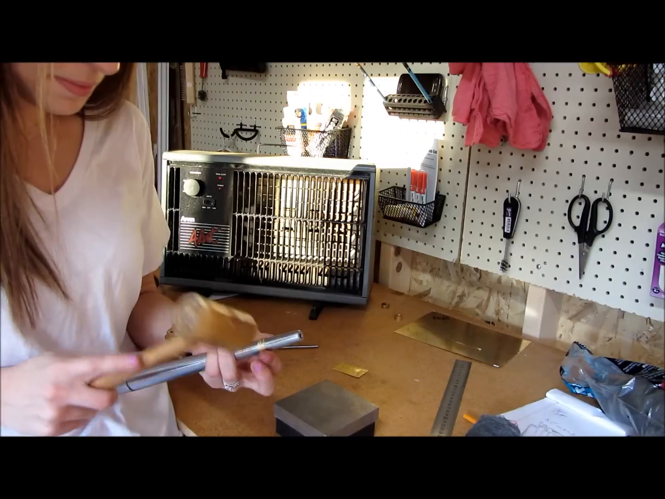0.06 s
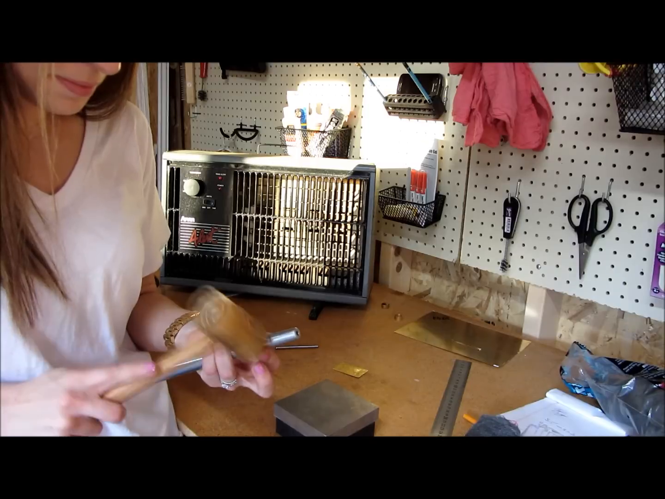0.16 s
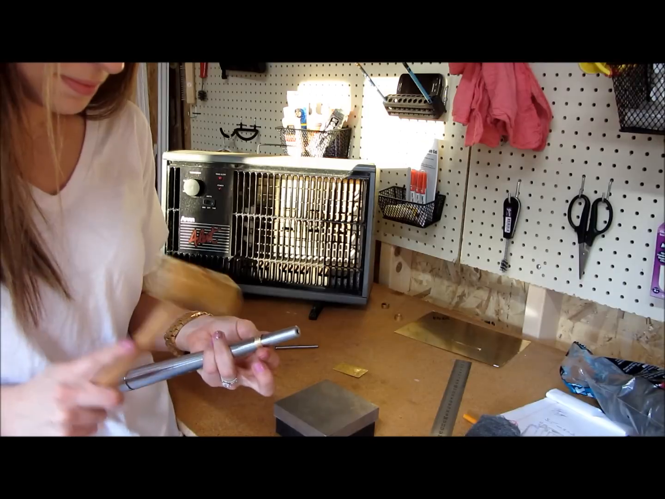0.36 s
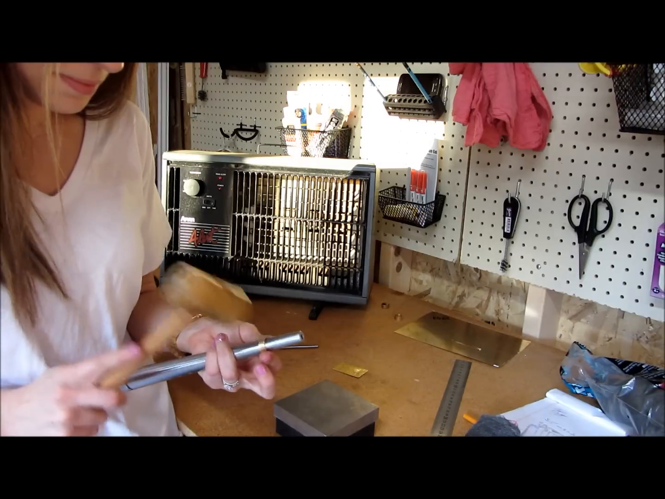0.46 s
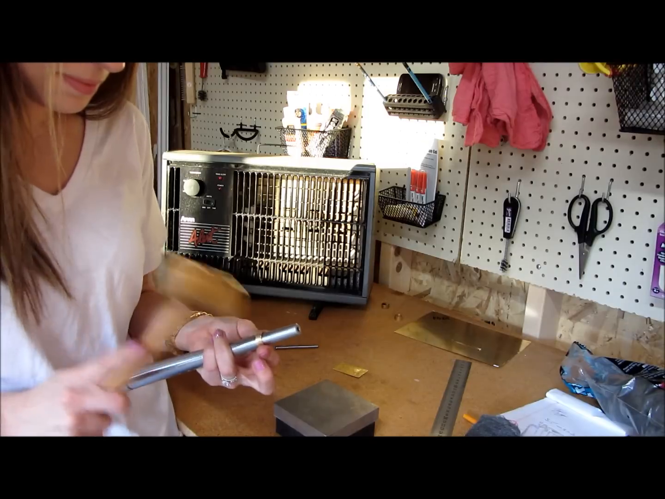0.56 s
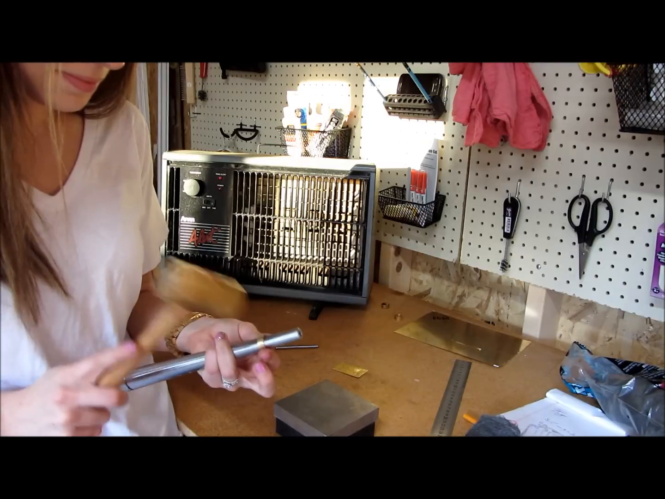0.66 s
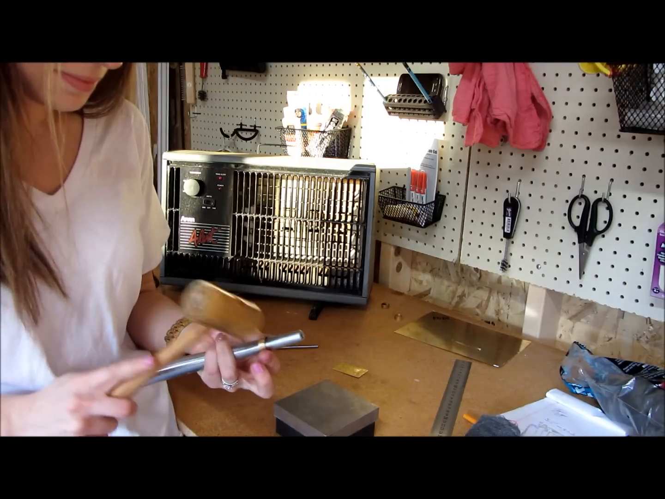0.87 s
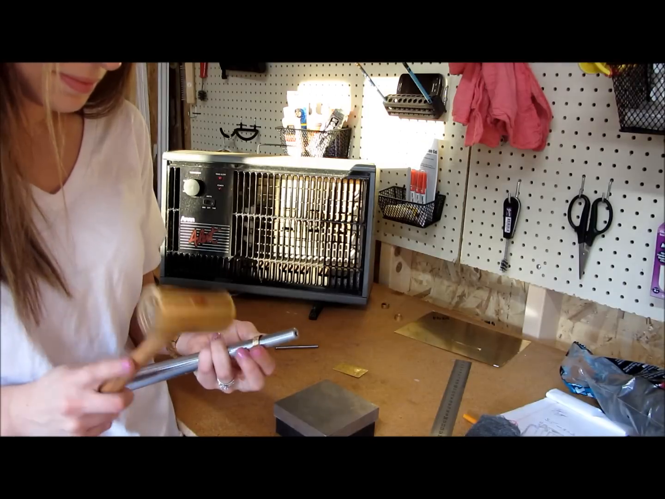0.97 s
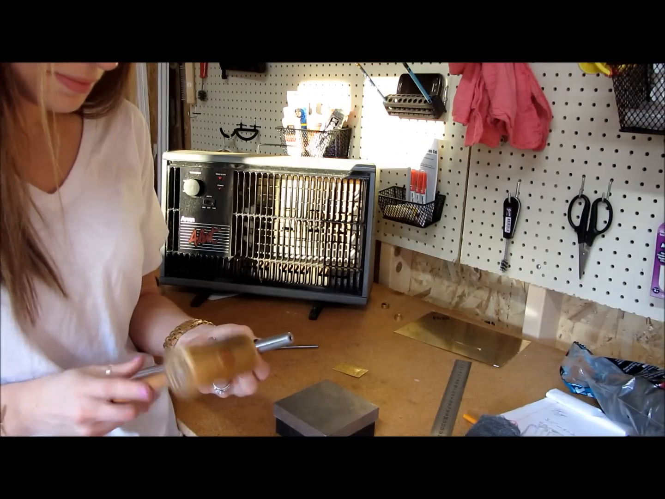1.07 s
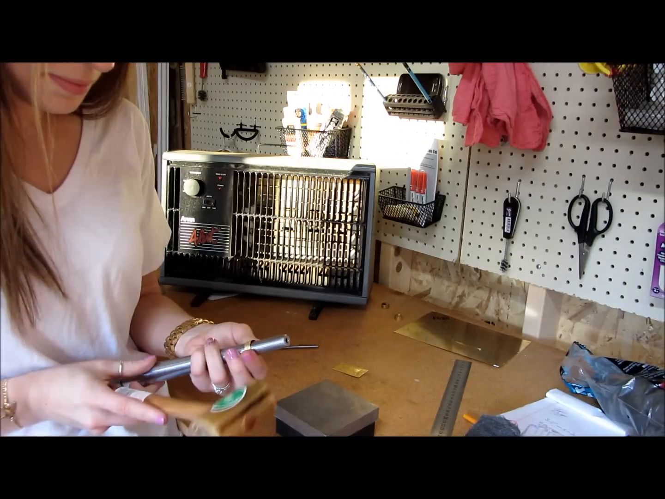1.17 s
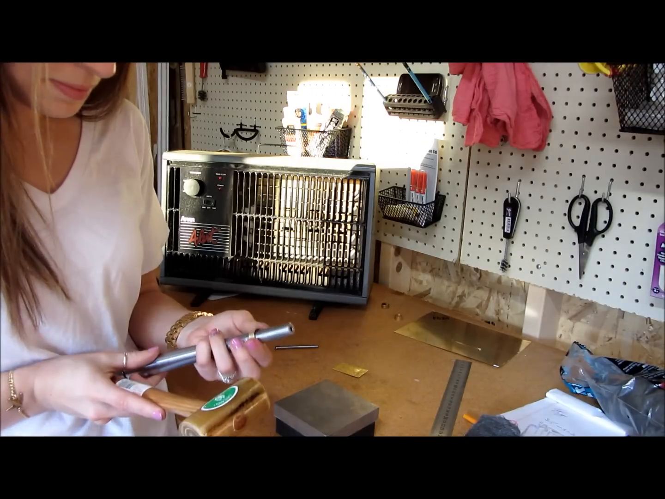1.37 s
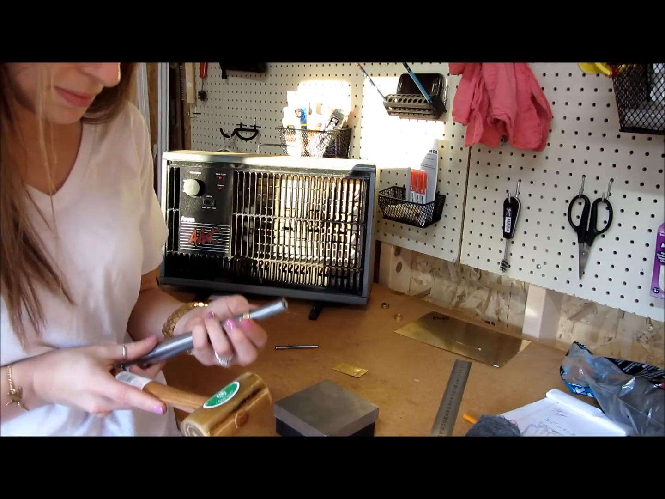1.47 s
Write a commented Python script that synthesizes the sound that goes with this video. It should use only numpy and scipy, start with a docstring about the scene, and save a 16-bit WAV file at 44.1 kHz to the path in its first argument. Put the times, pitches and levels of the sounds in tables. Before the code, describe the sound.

A mallet taps a ring on a hand-held steel rod four times, quickly and evenly. Each dry knock carries a brief metallic clink. A faint tick follows, heard close by in a small, quiet workshop.

```python
"""A mallet taps a ring on a hand-held steel mandrel four times in a small, quiet workshop.
Each impact gives a dry knock and excites the bending modes of the bar, in a mix set by where it lands;
the hand soon damps them. The ring clacks on the bar, faint resonances of the bench and the room ring
after each knock, and the walls reverberate. One faint tick of metal follows.
Soft air noise, a rumble and a low mains hum lie underneath."""
import sys
import numpy as np
from scipy import signal
from scipy.fft import rfft, irfft
from scipy.io import wavfile

SR = 44100
rng = np.random.default_rng(int(sys.argv[2]) if len(sys.argv) > 2 else 0)


def master_out(mix):
    """Clip the mix to full scale and print it as 16-bit PCM to the path in sys.argv[1]."""
    frames = np.transpose(np.atleast_2d(mix))
    ceiling = np.clip(frames, -1, 1)
    pcm = np.round(ceiling * 32767).astype(np.int16)
    wavfile.write(sys.argv[1], SR, pcm)


N = 66150
TIME, FREQS = np.arange(N) / SR, np.fft.rfftfreq(N, 1 / SR)

# Spectrum of the air noise. Each row: frequency in Hz, relative spectral density in dB.
AIR_SPECTRUM = [(15, -59), (25, -34), (130, -4.5), (335, -20.5), (373, -19.5), (1040, -25.5), (2550, -31),
                (3920, -39.5), (6920, -41.5), (16000, -67.5)]
# Course of the low rumble. Each row: time in seconds, gain in dB.
RUMBLE_GAINS = [(0, 3), (.58, 3), (.65, -6), (1.5, 2.5)]
# Mallet blows. Each row: start in seconds, then gains in dB for the knock, its bass, its crack,
# its treble, the ring's clack and each of the five bar modes.
MALLET_BLOWS = [(0.226, 0.5, -4, 0.5, 1, -0.5, -19.5, -9.5, -52, -29.5, -62.5),
                (0.4295, 2, -9.5, -1.5, 2.5, 2, -21.5, -27.5, -21, -23, -55),
                (0.6259, -3, -4.5, 4.5, -7.5, 6.5, -31, -10, -19, -34.5, -56),
                (0.8156, -1, -1, -6, 6.5, 7, -24.5, -11.5, -30, -32.5, -60.5)]
# Spectrum of the mallet's contact. Each row: frequency in Hz, level in dB.
KNOCK_SPECTRUM = [(60, -20.5), (160, -6), (400, -1.5), (800, 5), (1400, 10), (2600, 14.5), (3400, 9.5),
                  (4200, -0.5), (6000, 3), (8500, -1.5), (11000, -8.5), (16000, -21.5)]
# Reverberation. Each row: frequency in Hz, level in dB, T60 in seconds, left-right correlation.
ROOM_BANDS = [(120.1, -8, 0.27, 1), (396.7, 3, 0.57, .7), (756, -0.5, 0.33, .5), (1730, -3.5, 0.4, .3),
              (2960, -6, 0.37, 0), (4575, -3, .32, .05), (7450, -6.5, .31, 0), (14000, -13.5, 0.32, 0.079)]
# Bending modes of the mandrel, each with a twin in the other plane. Each row: frequency in Hz,
# T60 in seconds, reverberant-to-direct ratio in dB, scattered-to-standing ratio in dB,
# twin's offset in Hz, twin's relative level in dB.
BAR_MODES = [(1138, 0.17, -8.5, 11.5, -14, -23.5), (2902.7, 0.24, -13, 2.5, 1, -21),
             (5371, 0.085, -1, 5, -43, -14.5), (8523, 0.11, -16, 1.5, 27.5, -11.5),
             (12100, .14, -4, -0.5, 16.5, -14.5)]
# Modes of the ring clacking on the bar. Each row: frequency in Hz, level in dB, T60 in seconds.
RING_MODES = [(2790, -25.5, 0.023), (3022, -17.5, 0.022), (3217, -21.5, .028), (3533, -36.5, 0.027),
              (5422, -33, .06)]
# Faint resonances of the bench and the room that ring after each knock.
# Each row: frequency in Hz, level in dB, T60 in seconds.
BENCH_AND_ROOM_RESONANCES = [(175, -56, .05), (319, -41.5, 0.053), (463, -34, 0.066), (1290, -39, .12),
                             (1364, -43, .25), (1503, -44, 0.076), (1765, -47.5, .22), (2092, -41, .28),
                             (2328, -44, 0.12)]

BASS_HZ, CRACK_HZ, TREBLE_HZ = 950, 7000, 9700   # tone regions of a knock


def from_db(db):
    """Amplitude grows tenfold for every 20 dB."""
    return 10 ** (np.asarray(db) / 20)


def rms(x):
    """Effective amplitude is the root of the mean square."""
    return np.sqrt(np.mean(x ** 2) + 1e-24)


def at_hz(table, hz, column=1):
    """Interpolation of one column along a logarithmic frequency axis."""
    table = np.array(table)
    return np.interp(np.log(hz + 1e-9), np.log(table[:, 0]), table[:, column])


def delayed(x, seconds):
    """A delay is a phase lag proportional to frequency."""
    hz = np.fft.rfftfreq(2 * N, 1 / SR)
    return irfft(rfft(x, 2 * N) * np.exp(-2j * np.pi * hz * seconds))[..., :N]


def decay(t, t60):
    """Exponential damping: from t = 0 the level falls 60 dB every t60 seconds."""
    return 1000. ** (-np.maximum(t, 0) / t60)


def stereo_noise(correlation):
    """The balance of independent mid and side noise sets the correlation of two channels."""
    mid, side = rng.standard_normal((2, N))
    side = side * np.array([[1], [-1]])
    return (np.sqrt(1 + correlation) * mid + np.sqrt(1 - correlation) * side) / np.sqrt(2)


def room_tone(air_db=-61.5, rumble_top_hz=250, hum_hz=120, hum_db=-70):
    """Broadband air noise and a sinusoidal mains hum; the rumble dips and slowly recovers."""
    spectrum = rfft(stereo_noise(correlation=.3)) * from_db(at_hz(AIR_SPECTRUM, FREQS))
    air = irfft(spectrum, N)
    rumble = irfft(spectrum / (1 + (FREQS / rumble_top_hz) ** 4), N)
    swell = from_db(np.interp(TIME, *np.transpose(RUMBLE_GAINS)))
    hum = np.sqrt(2) * np.sin(2 * np.pi * (hum_hz * TIME + rng.random()))
    return from_db(air_db) * (air - rumble + swell * rumble) / rms(air) + from_db(hum_db) * hum


def minimum_phase_pulse(spectrum_db):
    """Minimum phase gives the most compact causal pulse for a magnitude spectrum."""
    cepstrum = irfft(np.log(from_db(spectrum_db)), N)
    causal_fold = 1 + np.sign(N / 2 - np.arange(N)) * (TIME > 0)
    return irfft(np.exp(rfft(cepstrum * causal_fold)), N)


def mallet_contact(db, bass_db, crack_db, treble_db, treble_lag_s=.00045):
    """A brief impact has a broad spectrum, coloured by how it lands; group delay rises with frequency."""
    bass = 1 / (1 + (FREQS / BASS_HZ) ** 2)
    crack = np.exp(-2 * (2 * np.log((FREQS + 1) / CRACK_HZ)) ** 2)
    treble = 1 - 1 / (1 + (FREQS / TREBLE_HZ) ** 4)
    colour_db = bass_db * bass + crack_db * crack + treble_db * treble
    click = minimum_phase_pulse(at_hz(KNOCK_SPECTRUM, FREQS) + db + colour_db)
    smear = np.exp(-1j * np.pi * treble_lag_s * FREQS ** 2 / TREBLE_HZ)
    return irfft(rfft(click) * smear, N) * (TIME < .5)


def direct(x, right_lag_s=.00003):
    """Path difference: the direct wave arrives on the left first."""
    return np.array([x, delayed(x, right_lag_s)])


def early_echoes(onset_s=.0012, level_db=-5.5, treble_db=-.5):
    """Early reflections from hands, bench and heater form a dense, short impulse response."""
    spray = stereo_noise(correlation=.5) * decay(TIME - onset_s, t60=.04) * (TIME > onset_s)
    spray = spray * from_db(level_db) / (rms(spray) * np.sqrt(N))
    treble = signal.sosfilt(signal.butter(1, TREBLE_HZ, "high", fs=SR, output="sos"), spray)
    return spray + (from_db(treble_db) - 1) * treble


def workshop_response(onset_s=.0015, build_s=.0052):
    """A diffuse field builds up, then each third-octave band decays at its own rate."""
    edges = np.geomspace(70, 18000, 25)
    t = np.maximum(TIME - onset_s, 0)
    response = 0
    for low, high in zip(edges, edges[1:]):
        centre = np.sqrt(low * high)
        db, t60, correlation = (at_hz(ROOM_BANDS, centre, column) for column in (1, 2, 3))
        band = irfft(rfft(stereo_noise(correlation)) * ((FREQS >= low) & (FREQS < high)), N)
        band = band * decay(t, t60) * (1 - np.exp(-t / build_s))
        unit_gain_rms = np.sqrt(2 * (high - low) / SR / N)
        response = response + band / rms(band) * unit_gain_rms * from_db(db)
    return response


def reverb(x, response):
    """Reflected sound is the source convolved with an impulse response."""
    return signal.fftconvolve(x[None], response, axes=1)[:, :N]


def mallet_knocks(room):
    """Each impact arrives as a direct pulse, then early reflections and reverberation."""
    knocks = sum(delayed(mallet_contact(db, bass, crack, treble), start)
                 for start, db, bass, crack, treble, *_ in MALLET_BLOWS)
    return direct(knocks) + reverb(knocks, early_echoes() + room)


def mode(start, hz, t60, rise_s=.0008):
    """A struck normal mode vibrates freely as a damped sinusoid."""
    t = np.maximum(TIME - start, 0)
    return np.sin(2 * np.pi * hz * t) * decay(t, t60) * (1 - np.exp(-t / rise_s))


def tone_field(tone, hz, room, scatter_db, phase_rad=.24):
    """A tone in a room sets up a standing wave plus a scattered, wavering field."""
    phase = phase_rad * np.array([[-1], [1]])   # the standing wave differs in phase left and right
    room_t60 = at_hz(ROOM_BANDS, hz, column=2)
    standing = reverb(tone, np.cos(2 * np.pi * hz * TIME + phase) * decay(TIME, room_t60))
    scattered = reverb(tone, room)
    return standing / rms(standing) + from_db(scatter_db) * scattered / rms(scattered)


def blend(x, wet, wet_db):
    """Direct and reverberant sound add at a set energy ratio."""
    return direct(x) + wet * rms(x) / rms(wet) * from_db(wet_db)


def mandrel(room, grip_after_s=.029, grip_t60_s=.08):
    """Twin bending modes of slightly different frequency beat; the closing hand adds damping."""
    sound = 0
    for k, (hz, t60, wet_db, scatter_db, twin_hz, twin_db) in enumerate(BAR_MODES):
        tone, twin = 0, from_db(twin_db)
        for start, _, _, _, _, _, *modes_db in MALLET_BLOWS:
            pair = (mode(start, hz, t60) + twin * mode(start, hz + twin_hz, t60)) / (1 + twin)
            grip = decay(TIME - start - grip_after_s, grip_t60_s)
            tone = tone + from_db(modes_db[k]) * pair * grip
        sound = sound + blend(tone, tone_field(tone, hz, room, scatter_db), wet_db)
    return sound


def struck(modes, start):
    """Modal superposition: an impact excites all modes at once, here in alternating polarity."""
    return sum(from_db(db) * (-1) ** k * mode(start, hz, t60) for k, (hz, db, t60) in enumerate(modes))


def ring_clacks(room):
    """Collision of ring and bar excites high, strongly damped modes."""
    clacks = sum(from_db(db) * struck(RING_MODES, start) for start, _, _, _, _, db, *_ in MALLET_BLOWS)
    return blend(clacks, reverb(clacks, room), wet_db=-5.5)


def bench_and_room_resonances(room):
    """Linear response: faint resonances of bench and room ring in proportion to each knock."""
    ringing = sum(from_db(db) * struck(BENCH_AND_ROOM_RESONANCES, start)
                  for start, db, *_ in MALLET_BLOWS)
    return blend(ringing, reverb(ringing, room), wet_db=-14)


def metal_tick(room, start_s=1.067, gain_db=-46):
    """A tiny contact of metal in the hand radiates a band-limited impulse."""
    impulse = 1e-18 + (np.arange(N) == int(start_s * SR))
    bright_band = signal.butter(2, [2500, 9000], "band", fs=SR, output="sos")
    click = from_db(gain_db) * signal.sosfilt(bright_band, impulse)
    return direct(click) + reverb(click, room)


def scene():
    """Superposition: the pressures of all sources add in one room."""
    room = workshop_response()
    blows = mallet_knocks(room) + mandrel(room) + ring_clacks(room) + bench_and_room_resonances(room)
    return blows + metal_tick(room) + room_tone()


def record(dry, cutoff_hz=16700):
    """Band limiting: a steep low-pass filter removes the highest treble."""
    return signal.sosfilt(signal.ellip(10, .2, 80, cutoff_hz, fs=SR, output="sos"), dry)


dry = scene()
out = record(dry)
master_out(out)
```